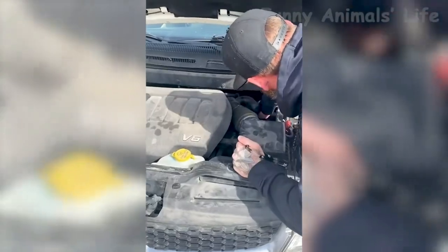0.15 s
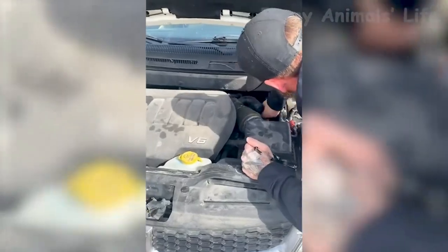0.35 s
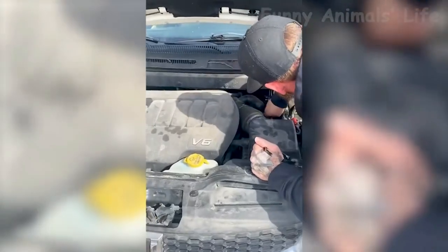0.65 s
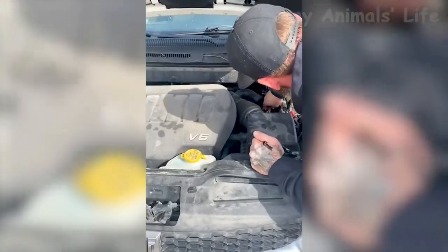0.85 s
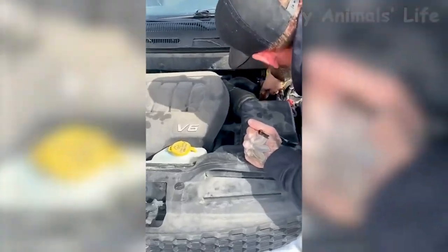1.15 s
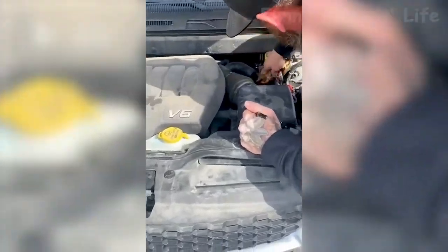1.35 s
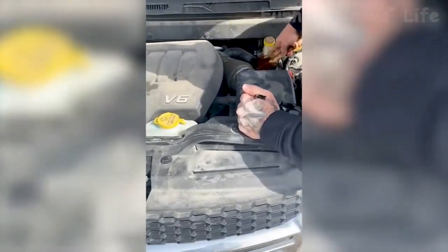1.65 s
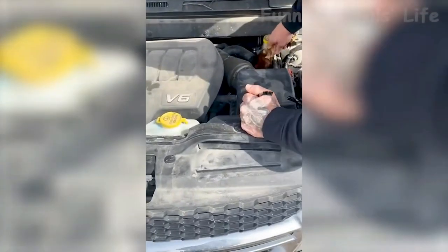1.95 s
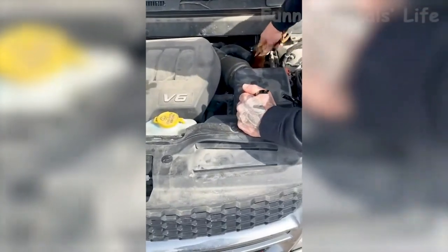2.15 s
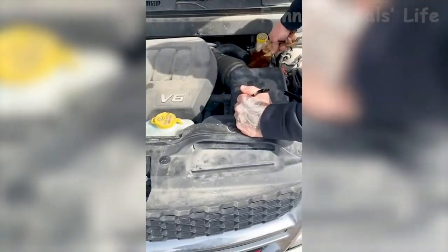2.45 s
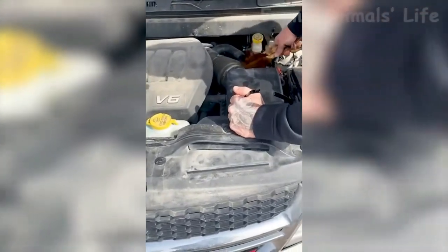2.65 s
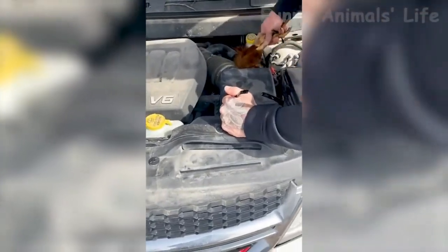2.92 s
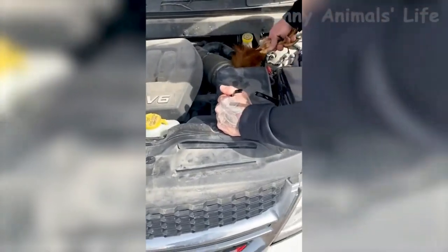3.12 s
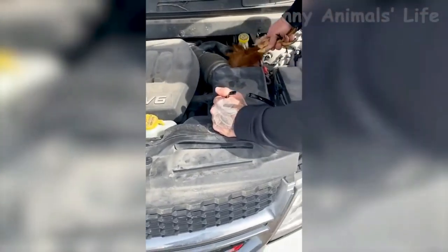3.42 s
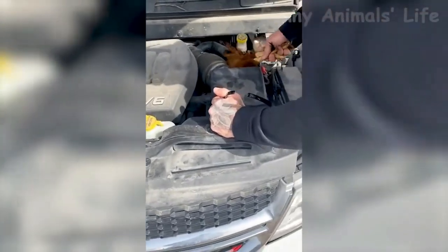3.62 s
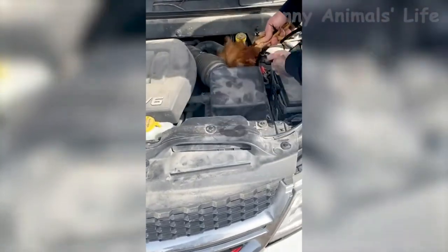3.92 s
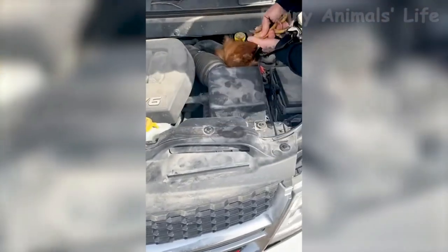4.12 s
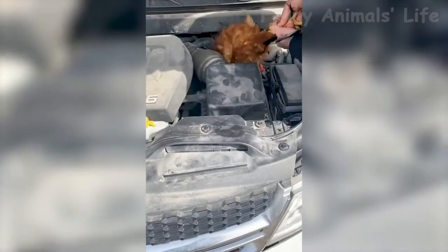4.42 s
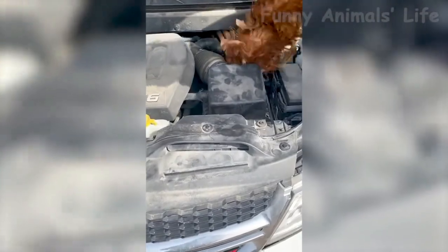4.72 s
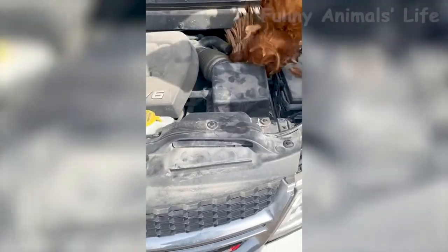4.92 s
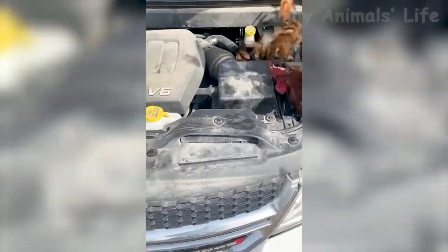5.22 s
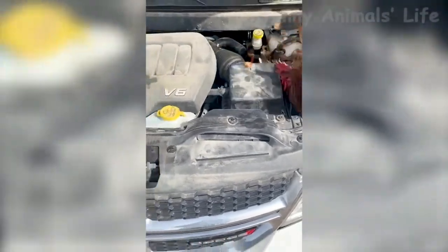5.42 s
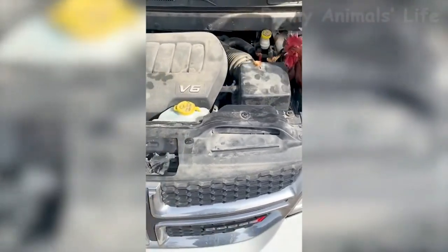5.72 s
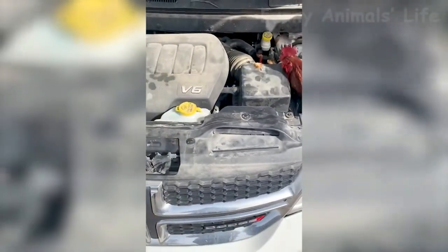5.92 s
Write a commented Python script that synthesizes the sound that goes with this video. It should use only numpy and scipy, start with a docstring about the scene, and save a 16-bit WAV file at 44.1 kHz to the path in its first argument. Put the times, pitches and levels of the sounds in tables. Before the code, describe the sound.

Three drawn-out chicken squawks, a pause of handling knocks on hollow plastic, then a sharp crack and a piercing, much louder squawk in light wind.

```python
"""Hen squawking in an engine bay

A hen held in an open car engine bay squawks five times near the microphone; the fourth call is loudest.
Her voice is a stack of syrinx overtones that breaks between a low and a high register and turns hoarse.
Noise bursts with ringing plastic covers make the knocks; shaped hiss makes feathers, sleeves and wind.
A faint wavering tone, short echoes of the bay and a quiet hiss of air fill in behind."""
import sys
import numpy as np
from scipy import signal
from scipy.fft import rfft, irfft
from scipy.io import wavfile
from scipy.ndimage import uniform_filter1d

SR = 44100
rng = np.random.default_rng(int(sys.argv[2]) if len(sys.argv) > 2 else 0)


def store_pcm(level_fs):
    """Save levels as 16-bit WAV."""
    pcm = np.round(np.clip(level_fs, -1, 1) * 32767).astype(np.int16)
    wavfile.write(sys.argv[1], SR, np.atleast_2d(pcm).T)


N = 267687  # length [samples]
EDGE_HZ = 15850  # upper band limit of the overtones and of the whole mix


def amp(db):
    """Gain from decibels."""
    return 10 ** (np.asarray(db) / 20)


def evened(x):
    """Scale to rms 1."""
    return x / np.sqrt(np.mean(x ** 2) + 1e-20)


def read(points, hz):
    """Read a (frequency, value) curve along a logarithmic frequency axis."""
    f, value = np.transpose(points)
    return np.interp(np.log(hz + 1), np.log(f + 1), value)


def add(mix, s, sound):
    """Lay a stereo sound into the mix from s seconds on, cut at the end."""
    part = mix[:, round(s * SR):][:, :sound.shape[1]]
    part += sound[:, :part.shape[1]]


def along(rows):
    """Smoothed gain over the whole scene from (time, level) rows, silent outside them."""
    s, db = np.transpose(rows)
    level_db = np.interp(np.arange(N) / SR, s, db, left=-120, right=-120)
    return uniform_filter1d(amp(level_db), size=800)


def wobble(count, hz):
    """Random drift of rms 1 with changes up to about hz a second."""
    lowpass = signal.butter(2, hz, fs=SR, output="sos")
    return evened(signal.sosfilt(lowpass, rng.standard_normal(count + 4000))[4000:])


# likeness of the left and right hiss: (frequency [Hz], correlation [0-1])
LIKENESS = [(50, 1), (3000, 0.85), (9000, 0.46), (15000, 0.39)]


def hiss(spectrum, patchy_db, flicker_db, size):
    """Stereo noise of rms 1 from random short-time spectra, with patches and wide-band flicker."""
    frames, hz = 4 * N // size + 5, np.fft.rfftfreq(size, 1 / SR)
    a, b, c, d, patches = rng.standard_normal((frames, len(hz), 5)).T
    patches = uniform_filter1d(patches, size=5, axis=0)
    patches = evened(uniform_filter1d(patches, size=5, axis=1))
    flicker = evened(uniform_filter1d(rng.standard_normal(frames), size=3))
    same = np.clip(read(LIKENESS, hz), -1, 1)[:, None]
    left = a + 1j * b
    right = same * left + np.sqrt(1 - same ** 2) * (c + 1j * d)
    level_db = read(spectrum, hz)[:, None] + patchy_db * patches + flicker_db * flicker
    frames_stereo = np.array([left, right]) * amp(level_db)
    return evened(signal.istft(frames_stereo, nperseg=size, noverlap=size * 3 // 4)[1][:, :N])


# steady stretches of voice, one list each; the pitch jumps between registers from list to list:
# (time [s], pitch [Hz], level [dB], beak opening [0-1], rasp share [0-1])
SQUAWKS = [
    [(0.235, 400, -49, 0, 0.86), (0.28, 428, -35, 0.09, 0.16), (0.325, 455, -31, 0.15, 1)],
    [(0.31, 541, -32, 0.62, 0.27), (0.35, 600, -30.5, 0.71, 0.08), (0.42, 642, -24.5, .65, 0.01),
     (0.522, 620.8, -29, 0.66, 0), (0.602, 638, -28, 0.46, 0.02), (0.784, 597.8, -27, 0.4, 0),
     (0.859, 575, -30.5, 0.31, 0), (0.89, 610, -24.5, 0.22, 0), (0.925, 505, -37, 0.19, 0.4),
     (0.95, 539, -71, 0.4, 0.9)],
    [(1.445, 549, -44, 0.28, 1), (1.476, 598, -28, 0.31, 1), (1.496, 614.6, -24.5, 0.66, 0.17),
     (1.542, 593.5, -26.5, 0.67, 0), (1.583, 594.4, -27, 0.76, 0.04), (1.639, 634.3, -25, 0.67, 0),
     (1.665, 665, -18.5, 1, 0.23)],
    [(1.65, 897, -20.5, 0.44, 0.9), (1.68, 880.5, -25.5, 0.21, 0), (1.71, 890, -18.5, 0.14, 0),
     (1.745, 782, -24, 0.1, 0.65)],
    [(1.735, 509, -22.5, 0.2, 0.65), (1.791, 539.4, -26, 0.34, 0), (1.82, 544.4, -29.5, 0.37, 0),
     (1.862, 528.7, -28, 0.21, 0.05), (1.907, 593.6, -31, 0.37, 0.11), (1.943, 632.7, -30, 0.41, 0.08),
     (2.004, 539, -25, 0.16, 0.07), (2.059, 501.5, -18, 0, 0.13), (2.11, 504, -64, 0.3, 1)],
    [(2.42, 482, -24, 0.12, 0.28), (2.445, 528, -23.5, 0.22, 0), (2.47, 529, -23.5, 0.21, 0.12),
     (2.495, 554, -26.5, 0.11, 0.23), (2.53, 617.5, -29, 0.7, 0.11), (2.56, 631, -24, .9, 0),
     (2.585, 627, -24.5, 0.1, 0.98)],
    [(2.575, 881, -21.5, 0.65, 0), (2.621, 904, -26.5, 0.72, 0.12), (2.729, 858, -23.5, 0.73, 0),
     (2.76, 703, -21.5, 0.3, 0.16)],
    [(2.755, 589, -22, 0.71, 0.9), (2.805, 608.4, -24.5, 0.63, 0.14), (2.835, 625, -25.5, 0.75, 0.01),
     (2.92, 606.3, -27.5, 0.58, 0.03), (2.96, 587.5, -30, 0.69, 0), (3.05, 571, -27, 0.61, 0),
     (3.11, 623.6, -25, 0.06, 0.02), (3.155, 561, -20, 0.15, 0.02), (3.22, 524, -61, .1, 0.53)],
    [(5.07, 787, -36, 0.5, 0.64), (5.106, 804, -27.5, 0.14, 0.71), (5.199, 714, -10.5, 0.47, 0.41),
     (5.222, 697, -29, 0.6, 0.3)],
    [(5.205, 598, -16, 0.68, 0.27), (5.256, 633, -16.5, 0.54, 0.05), (5.281, 600.6, -15.5, 0.35, 0),
     (5.347, 615, -14, 0.7, 0), (5.489, 629.8, -15, 0.71, 0.01), (5.519, 597.5, -16, 0.66, 0.03),
     (5.544, 503.3, -17.5, 0.17, 0.44), (5.565, 474, -35, 0.42, 0.07), (5.585, 443, -60, 0, 0.94)],
    [(5.997, 875, -36.5, 0.14, 0.83), (6.038, 825, -21, 0.12, 1), (6.069, 822, -20.5, 0.08, 0.5)],
]


def hen():
    """All stretches of the hen's voice, laid out in time."""
    out = np.zeros((2, N))
    for rows in SQUAWKS:
        add(out, *squawk(rows))
    return out


def squawk(rows):
    """Syrinx overtones; the rasp share of each is shaken by uneven cycles into a band of noise."""
    s, *columns = np.transpose(rows)
    t = np.arange(s[0], s[-1], 1 / SR)
    count = len(t)
    hz, level_db, opening, rasp = (np.interp(t, s, c) for c in columns)
    rasp = np.clip(rasp, .003, 1)
    hz = uniform_filter1d(hz, size=900, mode="nearest") * (1 + .003 * wobble(count, hz=30))
    turns = np.cumsum(hz * (1 + 0.026 * rasp * wobble(count, hz=150))) / SR
    gains = overtone_gains(t, hz, level_db, opening, rasp)
    # cycle-to-cycle chance, common to all overtones
    uneven = wobble(count, hz=202.7) + 1j * wobble(count, hz=198)
    # a second, slower vibration adds side lines to each overtone
    beat = np.cumsum(190 + 35 * wobble(count, hz=12.56)) / SR
    uneven = .6 * uneven + 1.5 * np.cos(2 * np.pi * beat)
    # rasp and the high register alternate strong and weak cycles
    doubled = 0.44 * rasp + 0.32 * (hz > 800)
    half_way = doubled * np.exp(-1j * np.pi * turns)
    voice = np.zeros((2, count))
    for order, gain in enumerate(gains, 1):
        own = wobble(count, hz=246) + 1j * wobble(count, hz=270)
        # uneven cycles blur high overtones most
        steady = (1 - rasp ** 2) ** (.5 + .045 * order ** 3)
        shaken = steady + np.sqrt(1 - steady ** 2) * (.5 * uneven + .5 * own)
        # higher overtones waver more as the head turns
        shaken *= amp(min(0.64 * order, 5.5) * wobble(count, hz=14.3))
        # lines half-way between the overtones stay strong in the treble
        shaken += half_way * (order > 1) * max(2 / order, 0.94)
        # the two ports hear a moving head differently
        drift = wobble(count, hz=8.8) + 1j * wobble(count, hz=12)
        apart = min(0.094 + 0.028 * order, .6) * drift
        shaken = shaken * (1 + np.outer([.5, -.5], apart))
        carrier = np.exp(2j * np.pi * order * turns - .12j * order ** 2)
        voice += np.sqrt(2) * gain * (shaken * carrier).real
    # a side pocket of the throat swallows one band
    voice = signal.lfilter(*signal.iirnotch(4250, 11.0, fs=SR), voice)
    # a hoarse voice throbs unevenly in strength
    voice *= amp(2 * np.minimum(6 * rasp, 1) * wobble(count, hz=35))
    voice *= signal.windows.tukey(count, 0.018 * SR / count)  # 9 ms fades
    return s[0], voice * amp([[-.7], [.7]])  # slightly to the right


# colour of the overtones: (frequency [Hz], relative level [dB])
BEAK = [(450, -7), (620, 9.5), (900, 12.5), (1200, 5.5), (1800, -2), (2400, 3), (3120, -1.5), (3410, -10.5),
        (3760, -6), (4080, -14.5), (5070, -14), (5600, -11.5), (6400, -18), (7520, -43.5), (9350, -26.5),
        (15800, -47.5)]
# tone balance as she twists about: (time [s], lowest overtone boost [dB], treble boost [dB])
CARRY = [(.35, 0.5, 3.5), (.42, -2, 0), (.6, 2, 2.5), (.78, -9, 2), (.9, -4.5, 1.5), (1.5, -1.5, 3),
         (1.6, 2, 4.5), (1.71, -6, -1), (1.85, 4.5, -2), (1.93, -2.5, 11.5), (2.05, 3, -7.5), (2.45, 3, -1),
         (2.56, 0.5, 4), (2.7, -2.5, -1.5), (2.85, 0, 2.5), (3.001, 3.5, 6), (3.13, 1.5, 3.5),
         (5.1, 4.5, 6.5), (5.2, -5, -1.5), (5.28, 13, 8.5), (5.33, 5, 5), (5.42, 3, 6), (5.52, 3, 6),
         (6.05, 4, 6)]
SHUT_HZ, OPEN_HZ = 1041, 2808  # throat resonance with the beak shut and fully open
THROAT_OCTAVES, THROAT_DB = 0.33, 14.5  # width and height of that resonance
TREBLE_HZ = 2800  # the treble starts here
RASP_DULL_DB = -4  # treble change of a fully raspy voice
OPEN_TILT_DB = 1.5  # per octave: a fully open beak is brighter
EFFORT_TILT_DB = 0.07  # per octave and dB of level: a louder call is brighter


def overtone_gains(t, hz, level_db, opening, rasp):
    """Throat and beak colour each overtone; the throat resonance climbs as the beak opens."""
    k = np.arange(1, 40)[:, None]
    overtone_hz = k * hz
    throat_hz = SHUT_HZ * (OPEN_HZ / SHUT_HZ) ** opening
    throat_db = THROAT_DB * np.exp(-(np.log2(overtone_hz / throat_hz) / THROAT_OCTAVES) ** 2)
    at, lowest_db, treble_db = np.transpose(CARRY)
    treble_db = np.interp(t, at, treble_db) + RASP_DULL_DB * rasp
    treble_share = 1 / (1 + (TREBLE_HZ / overtone_hz) ** 8)
    carry_db = np.interp(t, at, lowest_db) * (k == 1) + treble_db * treble_share
    tilt_db = (OPEN_TILT_DB * opening + EFFORT_TILT_DB * (level_db + 22)) * np.log2(k)
    colour = amp(read(BEAK, overtone_hz) + throat_db + carry_db + tilt_db) * (overtone_hz < EDGE_HZ)
    return amp(level_db) * colour / np.sqrt((colour ** 2).sum(0))


# knocks and scuffs of feet, wings and hands:
# (time [s], level [dB], decay by 60 dB [s], tilt [dB per octave], ringing [dB])
KNOCKS = [(0.5634, -26, 0.024, 6, -17), (0.8125, -24.5, 0.053, -4.5, -15), (1.013, -43.5, 0.068, 7, 4),
          (2.1132, -46, 0.036, 11, -3), (2.3307, -38.5, 0.025, 1.5, -12), (3.2948, -51.5, 0.062, 1, -17),
          (3.39, -31.5, 0.069, 3, 3), (3.768, -37, 0.04, -0.5, -14), (3.8681, -29, 0.052, -2, -9),
          (4.0056, -36.5, 0.016, 13, 23), (4.0827, -40, 0.025, 1.5, 16.5), (4.0985, -44, 0.017, 2, 17),
          (4.2633, -45, 0.27, 2, 12), (4.379, -36, 0.018, 7, 5), (4.527, -28, 0.01, 3, -18),
          (4.6061, -37, 0.081, 3, 15.5), (4.6374, -28.5, 0.054, 4, 12), (4.6696, -38, 0.068, 3.5, 18),
          (4.7438, -26, 0.013, 4.5, -2), (4.7904, -28, 0.044, 3, 13.5), (4.9766, -32.5, 0.096, 2.5, 2),
          (5.014, -34, 0.038, 4, 10), (5.041, -12.5, 0.014, 2, 3.5), (5.0706, -30, 0.015, 5, 12)]
# ringing modes of a plastic cover: (frequency [Hz], level [dB], decay by 60 dB [s])
COVER = [(216, 1, 0.022), (746, -27.5, 0.022), (2740, -21, 0.042), (3914, -9.5, 0.0087)]


def knocks(scuff):
    """Each knock is a burst of scuffing that also rings a plastic cover; dull ones thump more."""
    out, t = np.zeros((2, N)), np.arange(6000) / SR
    octaves = np.log2(np.clip(np.fft.rfftfreq(len(t), 1 / SR), 300, 9000) / 3000)
    detune = rng.uniform(.9, 1.1, (len(KNOCKS), len(COVER)))
    for (s, db, t60, tilt_db, ring_db), factors in zip(KNOCKS, detune):
        t60 = max(t60, .008)
        onset = (1 - np.exp(-t / (0.13 * t60))) ** 2  # long scuffs also start slowly
        swell = amp(-60 * t / t60) * onset * 4.4
        grain = scuff[:, round(s * SR):][:, :len(t)]
        burst = evened(irfft(rfft(grain) * amp(tilt_db * octaves)))
        ring = np.zeros(len(t))
        for (f, mode_db, mode_t60), factor in zip(COVER, factors):
            decay = amp(mode_db - 60 * t / mode_t60 + .4 * tilt_db * np.log2(f / 3000))
            ring += decay * np.sin(2 * np.pi * f * factor * t)
        ring *= np.minimum(t / .002, 1)
        add(out, s, amp(db) * (.5 * swell * burst + amp(ring_db) * ring))
    return out


def engine_bay(x):
    """Short echoes of the bay: sparse taps, partly different per channel, over a hollow longer band."""
    at = np.arange(60, 12000, 20)
    taps = np.zeros((2, 12100))
    places = at + rng.integers(0, 20, (2, len(at)))
    np.put_along_axis(taps, places, rng.choice([-1., 1.], (2, len(at))), axis=1)
    t = np.arange(taps.shape[1]) / SR
    hollow = signal.lfilter(*signal.iirpeak(1050, 3.0, fs=SR), taps)  # the cavity holds one band longer
    taps = taps * amp(-60 * t / 0.13) + 0.18 * hollow * amp(-60 * t / 0.32)
    taps[1] = .6 * taps[0] + .8 * taps[1]
    return signal.fftconvolve(x, taps / np.linalg.norm(taps[0]), axes=1)[:, :N]


# colour of scuffing on plastic: (frequency [Hz], relative level [dB per Hz])
SCUFF = [(150, -2), (450, -10.5), (680, -7.5), (800, -4), (930, -9.5), (2600, -20.5), (6000, -25.5),
         (7500, -37), (10000, -30.5), (16000, -37.5)]


def scuffing():
    """Grainy friction noise shared by the knocks and the rustle."""
    return hiss(SCUFF, patchy_db=2.5, flicker_db=1.5, size=256)


# feathers and sleeves, before the dip during calls: (time [s], level [dB])
RUSTLE = [(0.0, -48.5), (0.3, -57.5), (0.93, -50), (1.23, -61.5), (1.47, -49), (2.08, -63.5), (2.43, -55.5),
          (3.2, -57), (3.44, -72), (3.69, -58.5), (4.25, -56.5), (4.64, -43), (5.03, -49.5), (5.1, -28),
          (5.57, -52), (5.71, -55.5), (6.07, -58)]


def rustle(scuff):
    """Feathers and sleeves scuff on plastic, turned down 6 dB during each call."""
    calling = np.zeros(N)
    for rows in SQUAWKS:
        calling[round(rows[0][0] * SR):round(rows[-1][0] * SR)] = 1
    return along(RUSTLE) * amp(-6 * uniform_filter1d(calling, size=800)) * scuff


# a faint unsteady tone: (time [s], level [dB])
HUM = [(4.3, -58), (4.55, -62), (4.75, -46.5), (4.95, -53)]


def hum():
    """A soft tone near 800 Hz that wavers in pitch and strength."""
    turns = np.cumsum(800 + 18 * wobble(N, hz=6.9)) / SR
    return along(HUM) * amp(1.2 * wobble(N, hz=25.1)) * np.sin(2 * np.pi * turns)


# gusts: (peak time [s], peak level [dB], build-up by 20 dB [s], 0.02 s at least)
GUSTS = [(0.1, -45.5, -2), (0.52, -34, 0.34), (1.401, -32, -1), (1.709, -28.5, -0.09), (2.08, -44.5, 0.3),
         (2.478, -40.5, 0.2), (3.28, -42.5, 0.66), (3.72, -36.5, -0.78), (3.89, -35, 0.17),
         (4.29, -39.5, 0.37), (4.78, -42, -1.6), (5.04, -35, 0.03), (5.44, -43.5, 1.9)]
# colour of wind on the microphone: (frequency [Hz], relative level [dB per Hz])
BUFFET = [(35, -4.5), (70, 5), (120, -7), (300, -14), (900, -38), (1500, -83)]
LULL_DB, EBB = -54, 0.96  # steady breeze; a gust dies in EBB times its build-up


def wind():
    """Low buffeting noise on the microphone; each gust builds up and ebbs over a steady breeze."""
    t = np.arange(N) / SR
    power = amp(LULL_DB) ** 2
    for s, db, rise in GUSTS:
        away = np.maximum(s - t, (t - s) / EBB)
        power = power + amp(db - 20 * away / max(rise, .02)) ** 2
    return np.sqrt(power) * hiss(BUFFET, patchy_db=2.5, flicker_db=-4.0, size=1024)


# colour of the background air: (frequency [Hz], relative level [dB per Hz])
AIR = [(59, -34.5), (100, 0), (4110, -34.5), (6020, -37), (7290, -51), (8830, -37), (12700, -39),
       (13800, -58.5), (16000, -32)]


def air():
    """A quiet, nearly even hiss under everything."""
    return amp(-58.5) * hiss(AIR, patchy_db=1.0, flicker_db=-1.7, size=1024)


def scene():
    """Hen and knocks with their echoes, then rustle, tone, wind and air."""
    voice = hen()
    scuff = scuffing()
    near = voice + knocks(scuff)
    breeze = wind()
    background = air()
    echoes = amp(-9) * engine_bay(near)
    return near + echoes + rustle(scuff) + hum() + breeze + background


def record(dry):
    """A small microphone loses the deepest bass and rounds off the highest peaks; then the band limit."""
    thin = signal.sosfilt(signal.butter(3, 42, "high", fs=SR, output="sos"), dry)
    rounded = thin / (1 + (thin / .85) ** 4) ** .25
    band_limit = signal.firwin(511, EDGE_HZ, window=("kaiser", 9), fs=SR)
    return signal.oaconvolve(rounded, band_limit[None], "same")


dry = scene()
out = record(dry)
store_pcm(out)
```